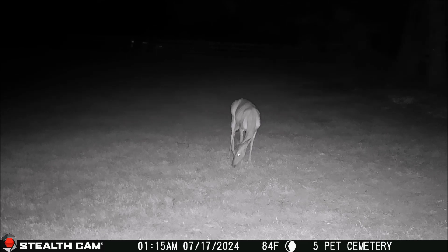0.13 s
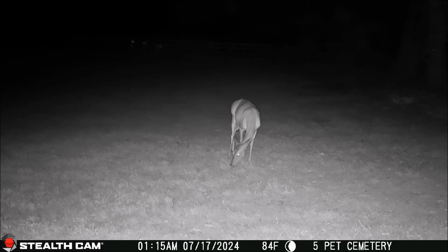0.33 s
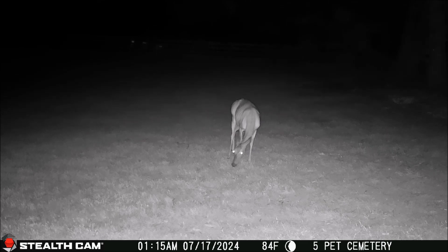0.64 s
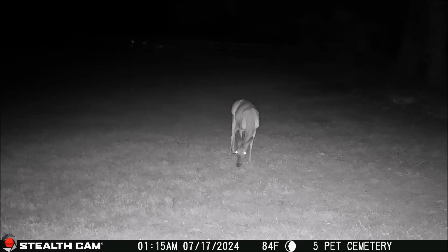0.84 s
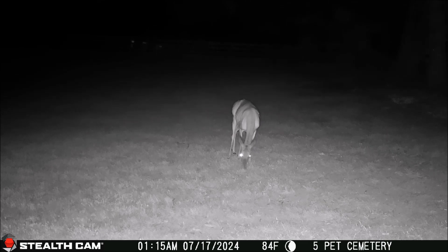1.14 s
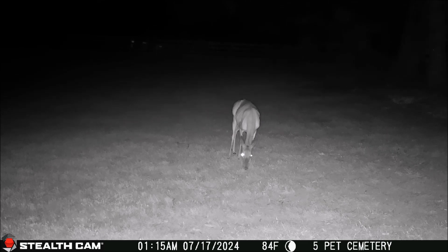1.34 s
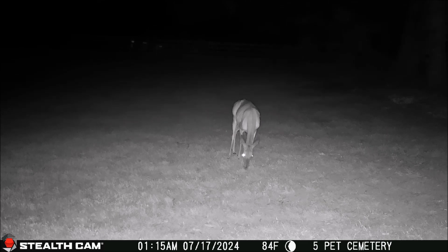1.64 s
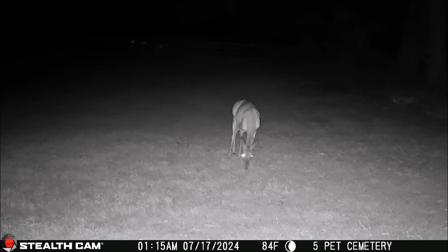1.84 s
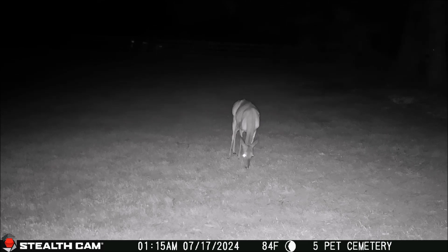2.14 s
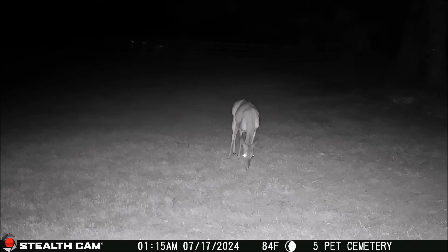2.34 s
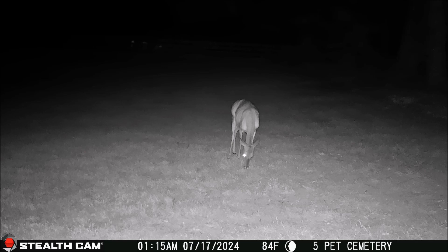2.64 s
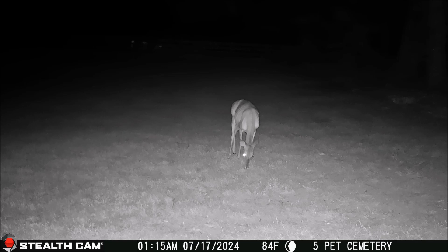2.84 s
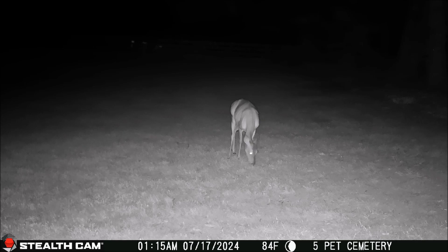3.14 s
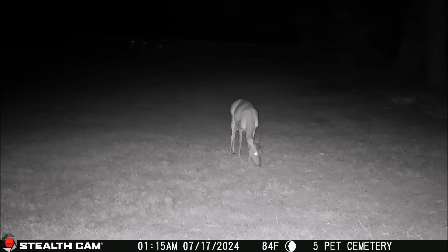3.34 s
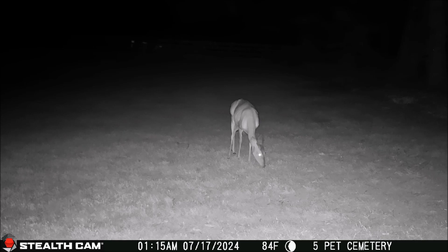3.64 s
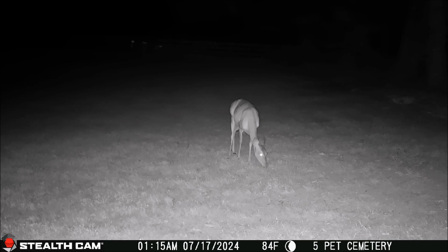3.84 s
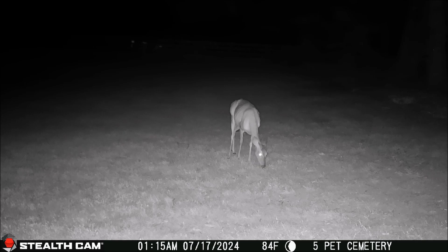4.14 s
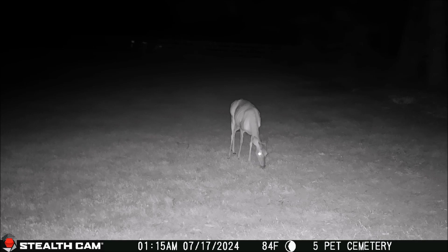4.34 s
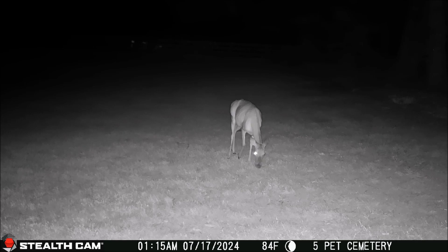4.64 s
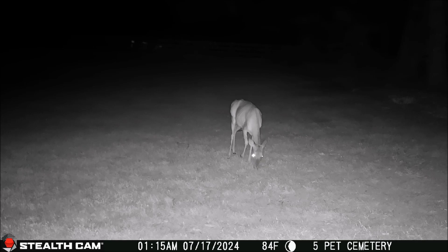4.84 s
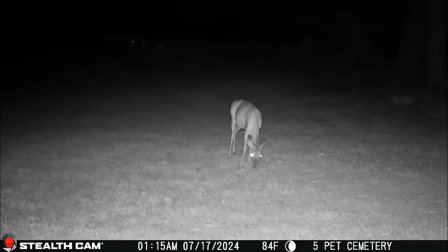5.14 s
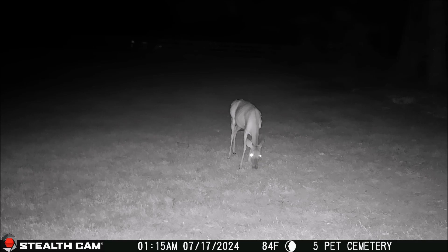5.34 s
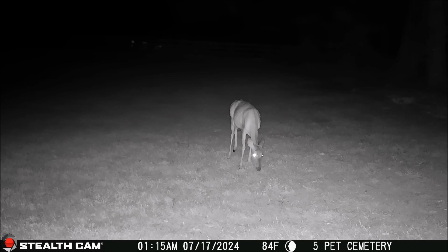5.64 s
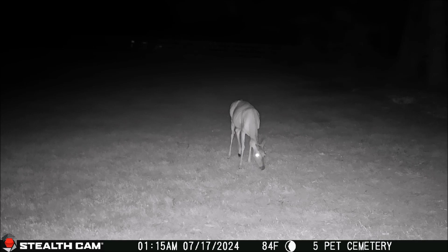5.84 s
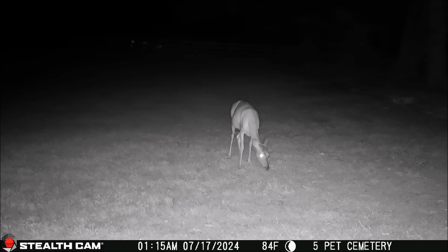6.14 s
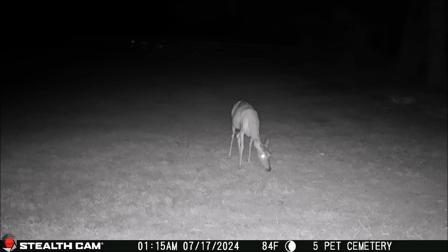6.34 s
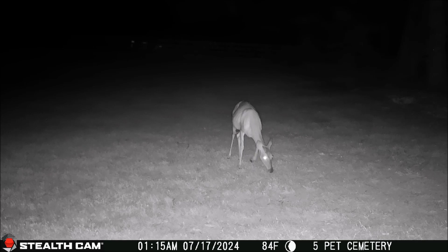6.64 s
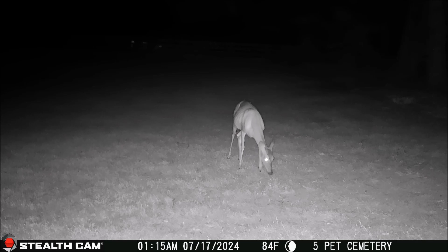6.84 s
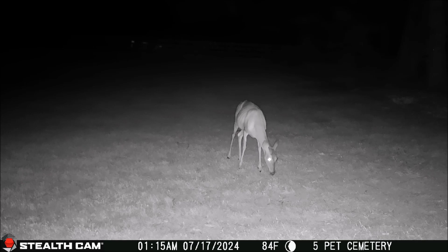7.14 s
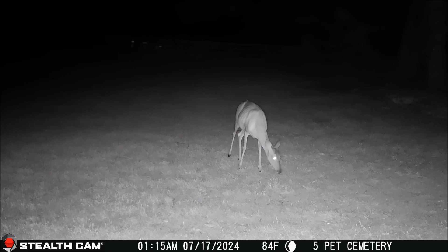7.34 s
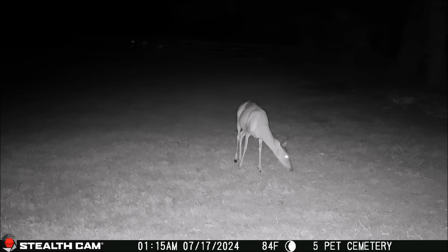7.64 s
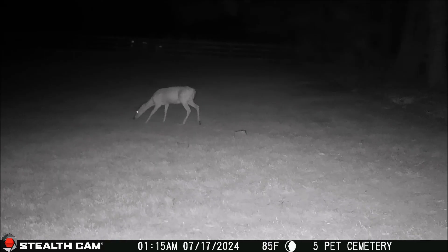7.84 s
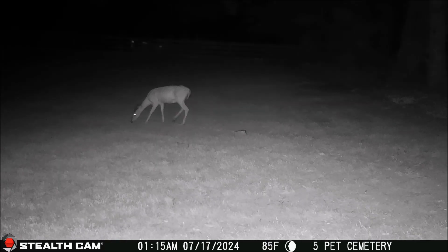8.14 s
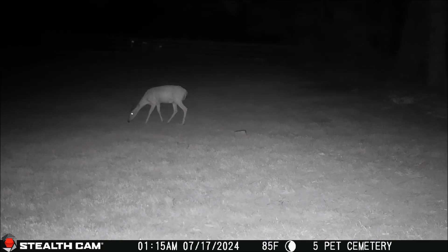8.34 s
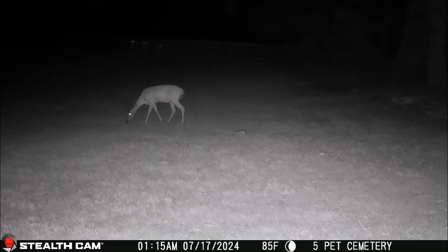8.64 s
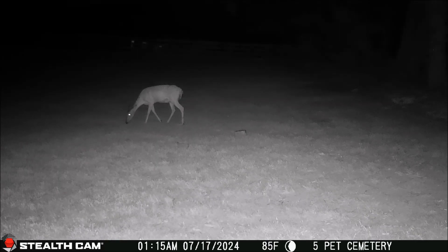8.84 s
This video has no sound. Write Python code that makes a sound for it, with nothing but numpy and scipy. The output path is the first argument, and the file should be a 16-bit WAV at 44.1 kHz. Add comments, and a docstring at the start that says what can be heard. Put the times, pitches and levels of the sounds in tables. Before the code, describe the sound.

Night on an open lawn beside woods. Tree crickets trill without pause, and a pulsing distant insect chorus swells and fades behind them. Nearer katydids rasp in brief phrases of one to four syllables, lightly echoed by trees. A small outdoor microphone adds hiss, a faint motor hum and soft, quick electronic ticks several times a second. Three barely audible hoarse hoots come and go, and a soft low thump lands late. The grazing deer is not heard.

```python
"""A warm night on a lawn at the edge of a wood.
Throughout: trilling tree crickets (wing-stroke sines), a far insect chorus and hiss (coloured noise), a motor hum.
From 0.1 s katydids rasp in short phrases (tooth bursts and a wing ring); from 0.2 s a camera's electronics tick.
Three faint hoarse hoots (unsteady sines) come at 0.9, 5.1 and 7.8 s, and four tiny clicks from 0.8 s on.
At 7.8 s the electronics give one soft thump: a decaying voltage step."""
import sys
import numpy as np
from scipy import signal
from scipy.fft import rfft, irfft
from scipy.io import wavfile

SR = 44100
rng = np.random.default_rng(int(sys.argv[2]) if len(sys.argv) > 2 else 0)


def bounce(signal):
    """Save signal as a 16-bit WAV file at the path given by the first command-line argument."""
    frames = np.transpose(np.atleast_2d(signal))
    limited = np.clip(frames, -1, 1)
    pcm = np.round(limited * 32767).astype(np.int16)
    wavfile.write(sys.argv[1], SR, pcm)


N = 396018
TIME = np.arange(N) / SR


def from_db(db):
    """Amplitude factor of a level in dB."""
    return 10 ** (np.asarray(db) / 20)


def rms_one(x):
    """Scales a signal to an RMS of 1."""
    return x / np.sqrt(np.mean(x ** 2) + 1e-20)


def drift(rate_hz, count=4000):
    """Random points of unit spread, rate_hz of them a second, joined by straight lines."""
    return np.interp(TIME * rate_hz, np.arange(count), rng.standard_normal(count))


def coloured(x, spectrum):
    """Gives a flat signal a relative spectrum and keeps its power."""
    hz, db = np.transpose(spectrum)
    log_bins = np.log(np.fft.rfftfreq(N, 1 / SR) + 1)
    gain = from_db(np.interp(log_bins, np.log(hz), db, left=-90, right=-90))
    return irfft(rfft(x) * rms_one(gain), N)


def resonance(x, hz, width_hz):
    """Two-pole resonance with gain 1 on top."""
    r = np.exp(-np.pi * width_hz / SR)
    zeros = np.array([1, 0, -1]) * (1 - r * r) / 2
    poles = [1, -2 * r * np.cos(2 * np.pi * hz / SR), r * r]
    return signal.lfilter(zeros, poles, x + 1e-18)


def swell(centre_s, length_s):
    """Smooth, flat-topped rise and fall; length_s is the width at 1/e."""
    out = np.zeros(N)
    near = slice(max(int((centre_s - length_s) * SR), 0), int((centre_s + length_s) * SR))
    out[near] = np.exp(-(2 * (TIME[near] - centre_s) / length_s) ** 4)
    return out


def syllables(phrases, period_s, length_s, rise_db):
    """Envelope of phrases: syllables at an even pace, each rise_db above the last."""
    out = np.zeros(N)
    for first_s, count, db, *_ in phrases:
        for k in range(round(count)):
            level = from_db(db + rise_db * (k - (count - 1) / 2))
            out += level * swell(first_s + k * period_s, length_s)
    return out


def eased(x):
    """Opens a sound softly over 4 ms."""
    return x * np.sin(np.pi / 2 * np.minimum(TIME / .004, 1)) ** 2


def trees(x, t60_s, wet_db, count=160):
    """Trunks and leaves scatter a sound into many dying echoes."""
    delays_s, echoes = rng.uniform(.008, .5, count), np.zeros(SR)
    echoes[(delays_s * SR).astype(int)] = rng.standard_normal(count) * from_db(-60 * delays_s / t60_s)
    scattered = signal.fftconvolve(eased(x), echoes / np.linalg.norm(echoes))[:N]
    return x + from_db(wet_db) * scattered


def air(motor_hz=25.26, hiss_db=-59.0):
    """Even hiss and rumble under a far motor: wavering harmonics of its turning rate."""
    # night air and hiss: (frequency [Hz], relative density [dB])
    air_spectrum = [(20, 0), (60, -2.5), (150, -5.5), (300, -7), (700, -9.5), (1200, -11), (2500, -9),
                    (5000, -21.5), (6800, -25.5), (8200, -30.5), (8900, -40), (9600, -38.5), (11000, -47.5),
                    (15500, -48.5)]
    # motor hum: (multiple of turning rate, mean level [dB])
    harmonics = [(1, -85.5), (2, -82), (3, -92), (4, -81), (5, -76), (6, -83), (7, -80.5)]
    turn = 2 * np.pi * np.cumsum(motor_hz * (1 + .003 * drift(2))) / SR
    hum = np.zeros(N)
    for k, db in harmonics:
        tone = rms_one(np.sin(round(k) * turn + rng.uniform(0, 2 * np.pi)))
        hum += from_db(db + 2 * drift(2.8)) * tone
    return hum + from_db(hiss_db) * coloured(rng.standard_normal(N), air_spectrum)


def far_insects(syllable_s=0.1, period_s=0.114, murmur_db=-59, throb_db=1.2, bright_throb_db=0.88,
                throb_hz=18, bright_db=-2.0, wash_db=-54):
    """Throbbing noise bands: deep katydid phrases over a murmur, a swelling bright chorus, an even wash."""
    # deep katydids: (centre of first syllable [s], syllables, level before throb [dB])
    deep_phrases = [(.035, 2, -50), (.85, 3, -54.5), (1.73, 4, -52.5), (2.4, 5, -52.5), (3.35, 4, -53),
                    (3.9, 4, -55.5), (4.65, 4, -53.5), (5.23, 2, -55), (5.46, 3, -53), (6.22, 3, -56),
                    (6.95, 4, -51), (8.23, 2, -57.5), (8.45, 3, -52.5), (8.92, 1, -56)]
    # bright chorus, before bright_db and throb: (time [s], level [dB])
    bright_swell = [(0.0, -50), (0.15, -47.5), (0.42, -61.5), (1.1, -47), (1.25, -58.5), (2.54, -51),
                    (2.76, -47), (3.14, -55), (4.36, -50), (4.51, -52.5), (4.98, -50), (5.28, -57.5),
                    (5.71, -48.5), (5.76, -53.5), (6.3, -49.5), (6.73, -55), (7.03, -49), (8.27, -56.5),
                    (8.6, -48), (8.95, -58)]
    # spectra of deep group, bright group, wash of countless insects: (frequency [Hz], relative density [dB])
    deep_wing = [(1200, -23.5), (1550, -8.5), (1850, 1.5), (2200, -3), (2600, 2.5), (2950, 3.5),
                 (3400, -6.5), (4200, -4), (4700, -12), (5400, -25)]
    bright_wing = [(2000, -19.5), (2900, -0.5), (3400, -8), (3700, -2), (4150, 4.5), (4650, 2), (5000, -6),
                   (5400, -11.5), (5750, -21), (6100, -35)]
    wash_spectrum = [(1400, -39), (2000, -5), (2400, 5), (2700, -7.5), (3050, -2.5), (3400, -7),
                     (3800, -8.5), (4300, -4.5), (4700, -8.5), (5000, -13.5), (5600, -22), (6300, -25),
                     (7200, -49)]

    calls = np.hypot(syllables(deep_phrases, period_s, syllable_s, rise_db=0), from_db(murmur_db))
    deep_throb = from_db(throb_db * drift(throb_hz))
    deep = calls * deep_throb * coloured(rng.standard_normal(N), deep_wing)
    swell_db = np.interp(TIME, *np.transpose(bright_swell))
    bright_level = from_db(swell_db + bright_db + bright_throb_db * drift(throb_hz))
    bright = bright_level * coloured(rng.standard_normal(N), bright_wing)
    return deep + bright + from_db(wash_db) * coloured(rng.standard_normal(N), wash_spectrum)


def hoots():
    """Some far animal's short hoarse calls: sines of unsteady pitch, scattered by the trees."""
    # (centre [s], length [s], mean pitch [Hz], peak level before echoes [dB])
    hoot_calls = [(.9, .36, 721, -69), (5.06, 0.2, 743, -66), (7.77, 0.16, 712, -66.5)]
    hoarse = 1 + .04 * drift(120)
    calls = np.zeros(N)
    for centre_s, length_s, hz, db in hoot_calls:
        tone = np.sin(2 * np.pi * np.cumsum(hz * hoarse) / SR)
        calls += from_db(db) * swell(centre_s, length_s) * tone
    return trees(calls, t60_s=0.37, wet_db=1.5)


def thump(start_s=7.812, step_db=-43.5, swing_hz=2.6, decay_s=0.065, knock_share=.25, knock_s=0.0017):
    """A low-passed step in the supply voltage knocks once and sinks back to rest."""
    age_s = np.maximum(TIME - start_s, 0)
    sink = np.exp(-age_s / decay_s) * np.cos(2 * np.pi * swing_hz * age_s)
    knock = knock_share * np.exp(-age_s / knock_s)
    step = (age_s > 0) * (sink + knock)
    return from_db(step_db) * signal.sosfilt(signal.butter(2, 260, fs=SR, output="sos"), step)


def camera(tick_db=-52, spike_hz=503, stray_db=-3, fizz_db=1, count=6):
    """Ticks: quick runs of current spikes, two strays about each, through resonances and a high band."""
    # bursts of current: time [s]
    ticks_s = [.171, .263, .474, 0.66, .951, 1.216, 1.426, 1.73, 1.926, 2.207, 2.393, 2.696, 2.887, 3.105,
               3.171, 3.438, 3.648, 3.888, 4.065, 4.204, 4.427, 4.564, 4.616, 4.771, 4.921, 5.105, 5.252,
               5.397, 5.614, 5.731, 5.95, 6.113, 6.217, 6.427, 6.586, 6.729, 6.927, 7.062, 7.224, 7.394,
               7.541, 7.695]
    # resonances of the spikes: (frequency [Hz], width [Hz], gain [dB])
    spike_modes = [(170, 170, 32), (525, 480, 32), (1050, 1000, 32), (1583, 430, 29.5)]
    # one-sample clicks: (time [s], peak level [dB])
    tiny_clicks = [(.8455, -60), (.8694, -57), (5.5862, -50), (7.8121, -58)]

    spikes, clicks = np.zeros(N), np.zeros(N)
    for s in ticks_s:
        places_s = (np.arange(count) - (count - 1) / 2) / spike_hz
        jitter_s = rng.normal(0, .00006, count)
        run_s = s + places_s * rng.normal(1, 0.02) + jitter_s
        spikes[(run_s * SR).astype(int)] += from_db(tick_db + rng.normal(0, 2.9, count))
        stray_s = s + rng.uniform(-.012, .008, 2)
        spikes[(stray_s * SR).astype(int)] += from_db(tick_db + stray_db)

    body = np.zeros(N)
    for k, (hz, width_hz, db) in enumerate(spike_modes):
        body += (-1) ** k * from_db(db) * resonance(spikes, hz, width_hz)  # alternate polarity
    body = signal.sosfilt(signal.butter(2, 2600, fs=SR, output="sos"), body)
    fizz_band = signal.butter(4, [6600, 8400], "band", fs=SR, output="sos")
    fizz = from_db(fizz_db) * signal.sosfilt(fizz_band, spikes)
    for s, db in tiny_clicks:
        clicks[int(s * SR)] = from_db(db)
    return body + fizz + clicks


def trill(hz, strokes_per_s, sag=.02, wander=.008, open_share=.85, waver_db=2.0, unsteady=0.10015):
    """Each wing closing sounds a near-sine of its own strength and pitch, sagging as the stroke slows."""
    pace = strokes_per_s * np.maximum(1 + unsteady * drift(20), .1)
    cycles = np.cumsum(pace) / SR + rng.random()
    strength, detune, start = rng.standard_normal((2000, 3))[cycles.astype(int)].T  # one row per stroke
    stroke = np.minimum(cycles % 1 / np.clip(open_share, .2, 1), 1)  # 0 to 1, then silent
    pitch_hz = hz * (1 + wander * detune - sag * (stroke - .5))
    tone = np.sin(2 * np.pi * np.cumsum(pitch_hz) / SR + np.pi * start)
    return rms_one(np.sin(np.pi * stroke) * tone * from_db(waver_db * strength))


def crickets(count=5):
    """Several trillers of each kind at their own pitch and pace; far ones blur to narrow-band noise."""
    # kinds: (centre pitch [Hz], pitch spread [Hz], mean wing strokes [1/s], level [dB])
    cricket_kinds = [(2303, 66, 54, -47.5), (3003, 120, 55, -59.5), (4482, 230, 70, -60)]
    # far crickets blurred to a thin tone: (pitch [Hz], level [dB])
    thin_tones = [(4610, -68.5), (6328, -86.5)]
    out, places = np.zeros(N), np.linspace(-1, 1, count)
    for hz, spread_hz, strokes_per_s, db in cricket_kinds:
        paces = strokes_per_s * (1 + .25 * rng.permutation(places))
        kind = np.zeros(N)
        for place, pace in zip(places, paces):
            kind += trill(hz + spread_hz * place, pace) * from_db(-3 * place ** 2)
        out += from_db(db) * rms_one(trees(kind, t60_s=0.44, wet_db=-8.5))
    for hz, db in thin_tones:
        narrow = resonance(resonance(rng.standard_normal(N), hz, 37), hz, 37)
        out += from_db(db) * rms_one(narrow)
    return out


def near_katydid(syllable_s=0.067, period_s=0.114, teeth_per_s=330, tooth_decay=3.6, scrape_db=-4.5,
                 ring_db=-3, echo_t60_s=.55):
    """A scraper drags over a file: each tooth sets off a noise burst, and a wing cell rings on roughly."""
    # (centre of first syllable [s], syllables, level before scrape_db or ring_db [dB], mean wing ring [Hz])
    near_phrases = [(.13, 1, -54, 2970), (.843, 3, -49, 3077), (2.174, 1, -52.5, 3000),
                    (2.537, 4, -47, 3020), (3.384, 1, -55.5, 3040), (3.61, 2, -50.5, 2925),
                    (4.128, 3, -48, 3058), (4.653, 1, -57, 2840), (4.89, 2, -54, 2966),
                    (5.917, 3, -48, 3090), (6.284, 3, -46.5, 2930), (8.455, 3, -50, 3025)]
    # rest of the wing: (frequency [Hz], relative density [dB])
    wing_spectrum = [(1200, -42), (1900, -15), (2600, -4), (3050, -2.5), (3300, -2), (3600, -2),
                     (4100, 0.5), (4650, -2.5), (5300, -7), (5700, -16.5), (6100, -22), (8000, -51)]

    tooth = np.cumsum(teeth_per_s * (1 + .2 * drift(60))) / SR % 1
    scrape = rms_one(np.exp(-tooth_decay * tooth) * rng.standard_normal(N))
    strokes = syllables(near_phrases, period_s, syllable_s, rise_db=0.6)
    starts_s, _, _, ring_hz = np.transpose(near_phrases)
    phrase = np.searchsorted(starts_s[1:] - syllable_s, TIME)
    pitch_hz = ring_hz[phrase] * (1 + .05 * drift(330))
    ring = rms_one(np.sin(2 * np.pi * np.cumsum(pitch_hz) / SR) * from_db(1.3 * drift(200)))
    rasp = from_db(scrape_db) * coloured(scrape * strokes, wing_spectrum)
    return trees(rasp + from_db(ring_db) * ring * strokes, t60_s=echo_t60_s, wet_db=-5.5)


def scene():
    """All sources alike in both channels; only a faint hiss, of opposite sign, differs between them."""
    # differing hiss: (frequency [Hz], relative density [dB])
    side_spectrum = [(20, -42), (470, -43), (1280, -43), (1700, -20), (2080, -10), (2300, 5.5), (2580, -8),
                     (3020, -3.5), (3580, -9.5), (4500, -1.5), (6070, -23.5), (7900, -27.5), (9000, -46.5),
                     (15500, -50.5)]
    mid = air() + far_insects() + hoots() + thump() + camera() + crickets() + near_katydid()
    side = from_db(-65) * coloured(rng.standard_normal(N), side_spectrum)
    return np.array([mid + side, mid - side])


def record(dry, cutoff_hz=15750):
    """The sound opens softly and a steep elliptic low-pass cuts the top."""
    return signal.sosfilt(signal.ellip(10, .1, 70, cutoff_hz, fs=SR, output="sos"), eased(dry))


dry = scene()
out = record(dry)
bounce(out)
```